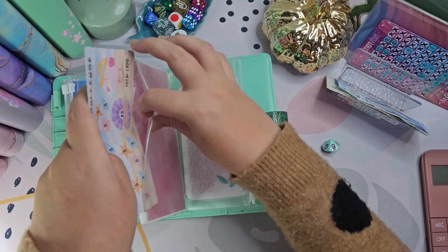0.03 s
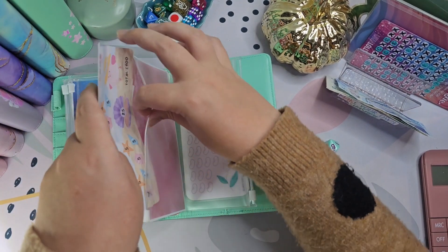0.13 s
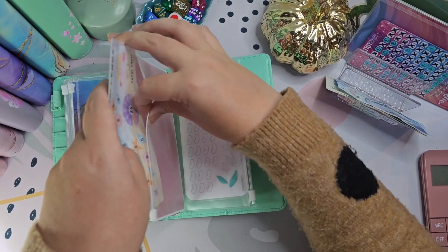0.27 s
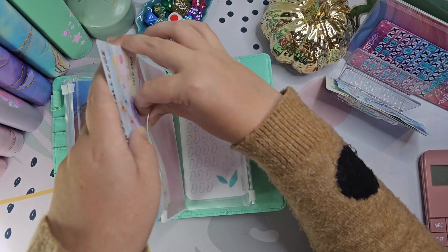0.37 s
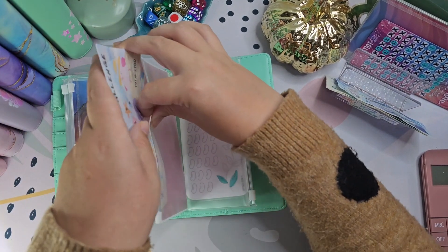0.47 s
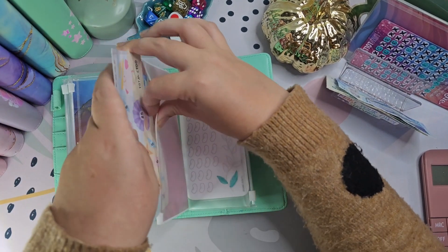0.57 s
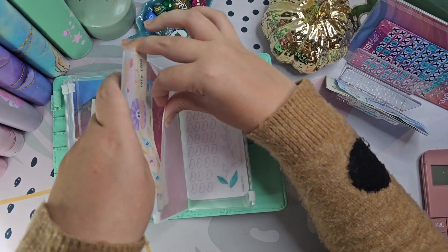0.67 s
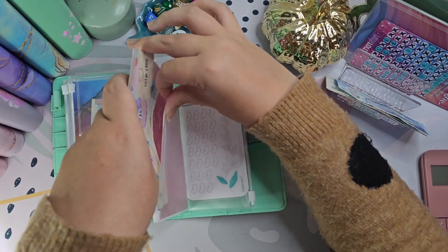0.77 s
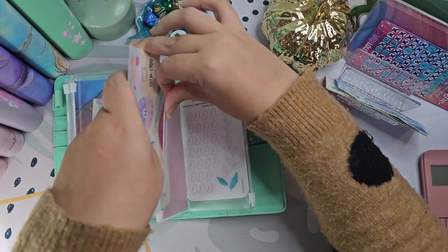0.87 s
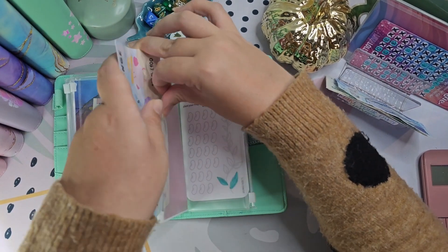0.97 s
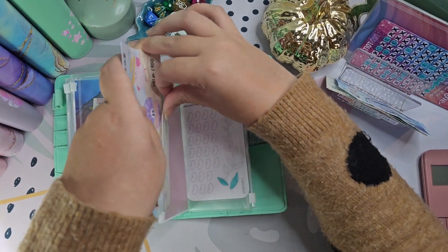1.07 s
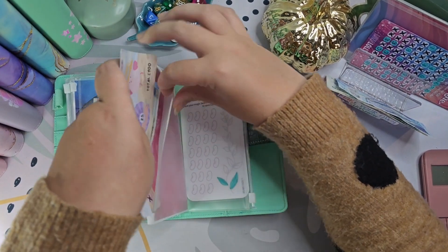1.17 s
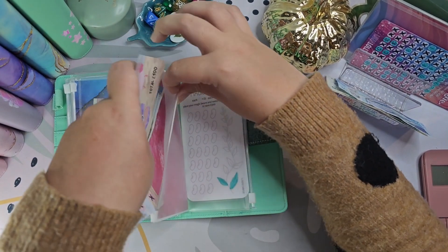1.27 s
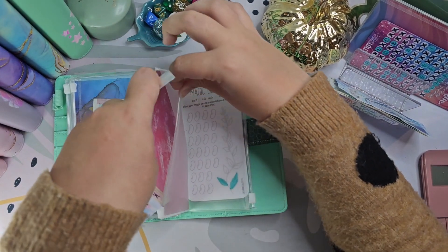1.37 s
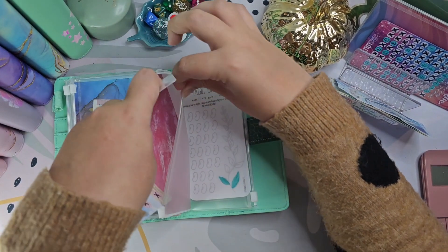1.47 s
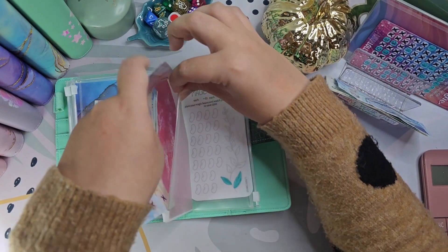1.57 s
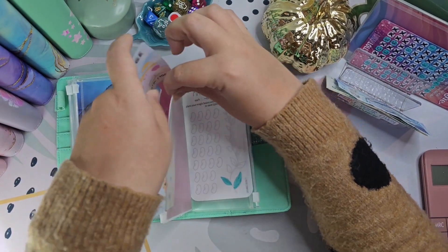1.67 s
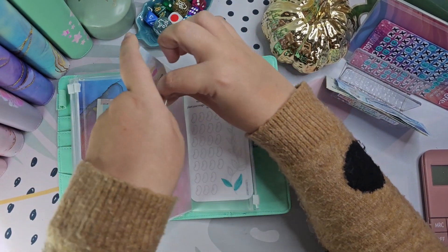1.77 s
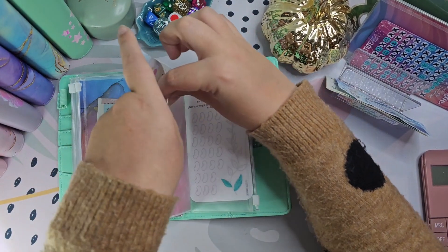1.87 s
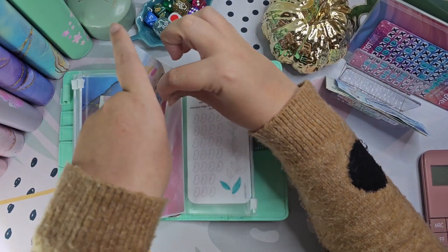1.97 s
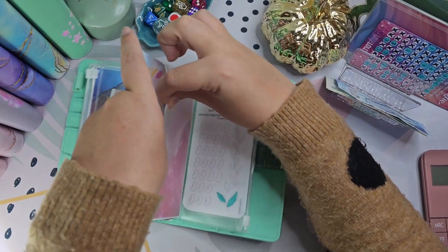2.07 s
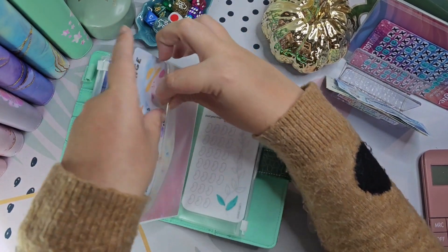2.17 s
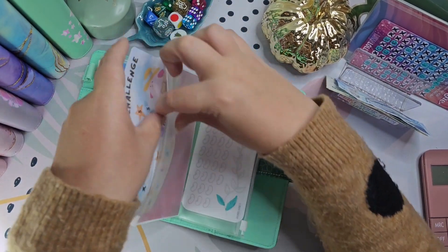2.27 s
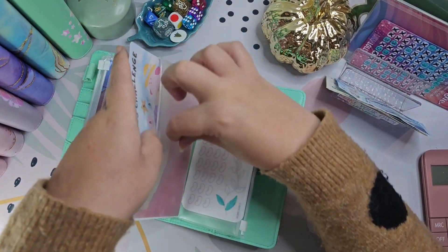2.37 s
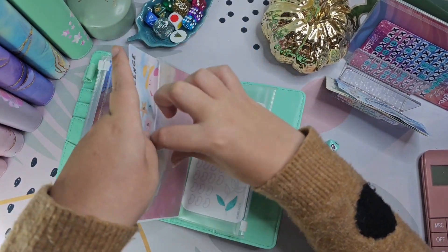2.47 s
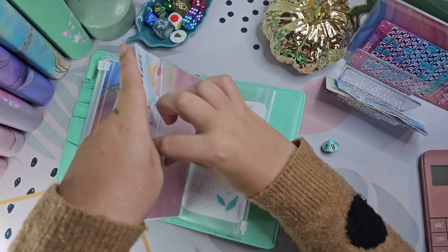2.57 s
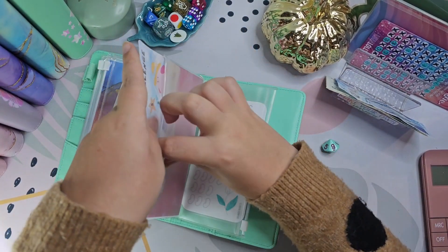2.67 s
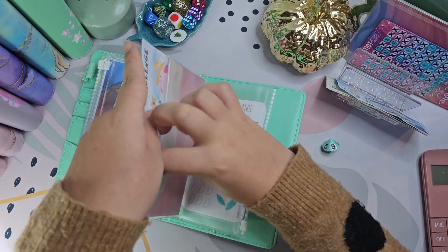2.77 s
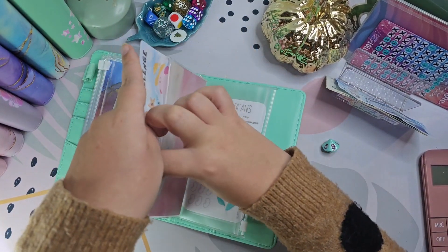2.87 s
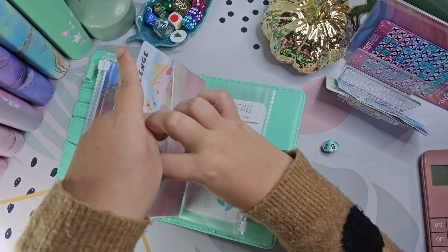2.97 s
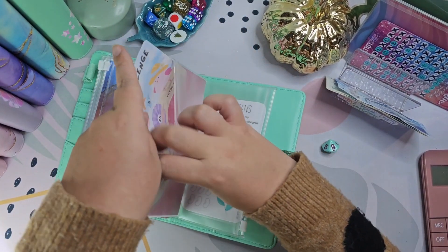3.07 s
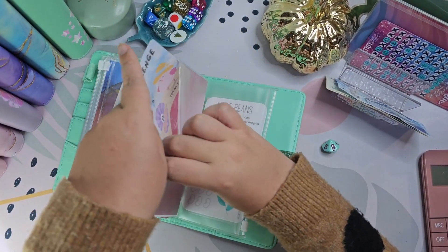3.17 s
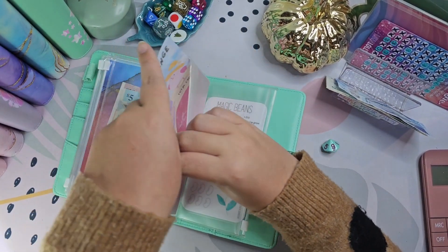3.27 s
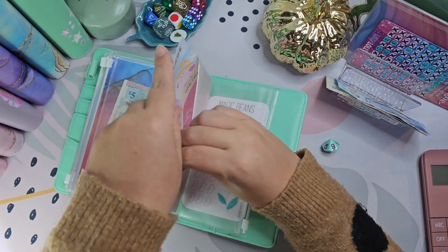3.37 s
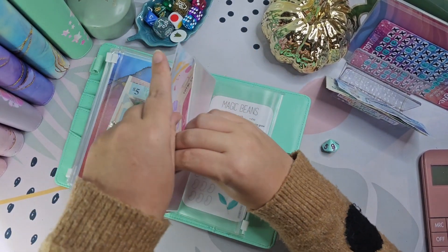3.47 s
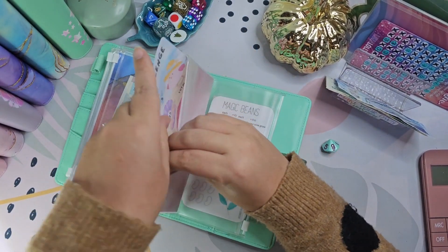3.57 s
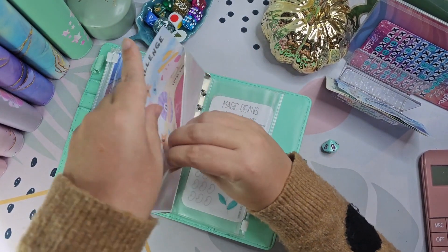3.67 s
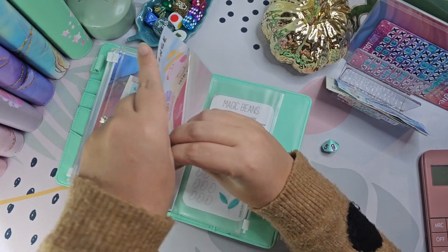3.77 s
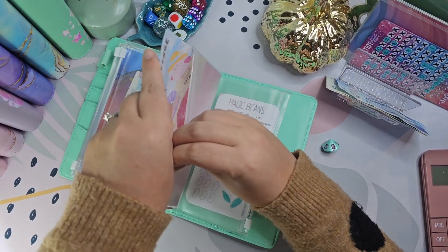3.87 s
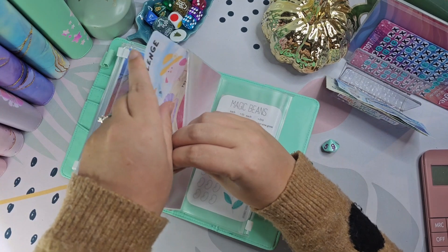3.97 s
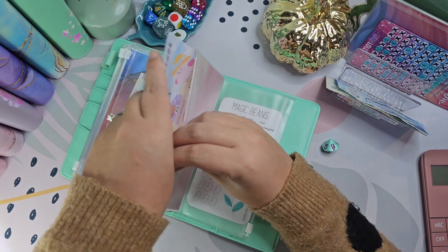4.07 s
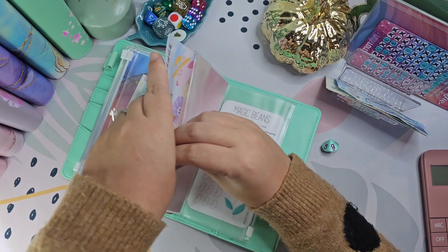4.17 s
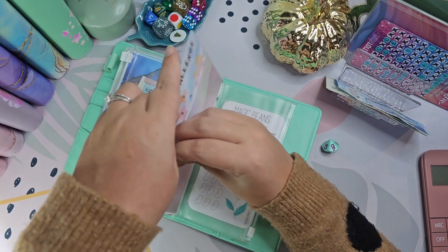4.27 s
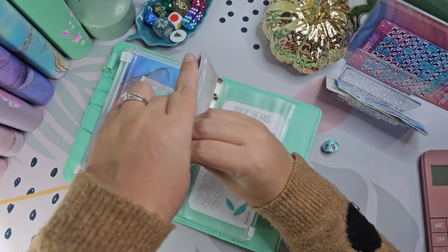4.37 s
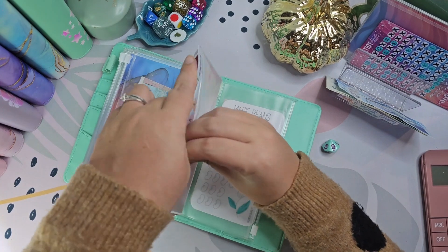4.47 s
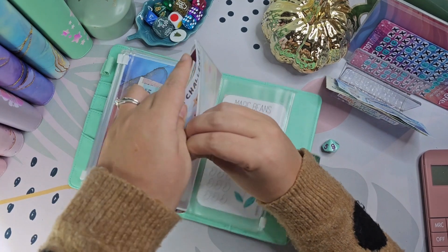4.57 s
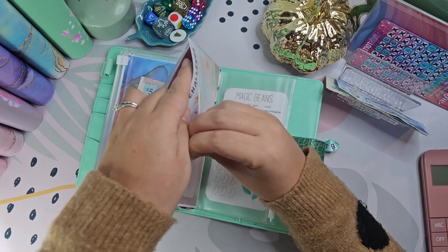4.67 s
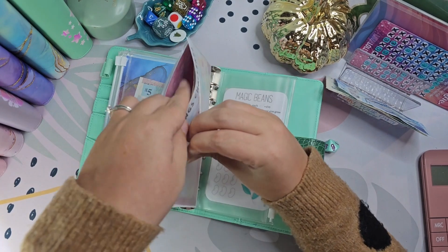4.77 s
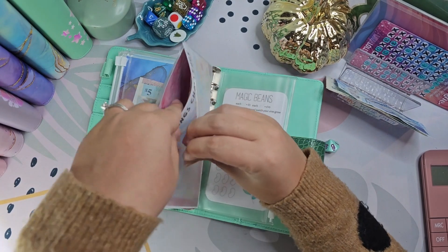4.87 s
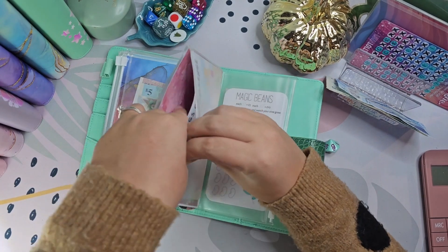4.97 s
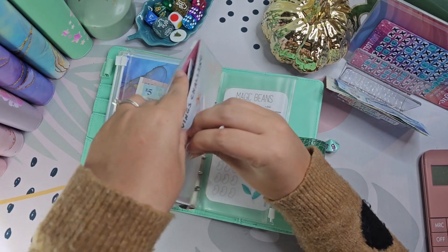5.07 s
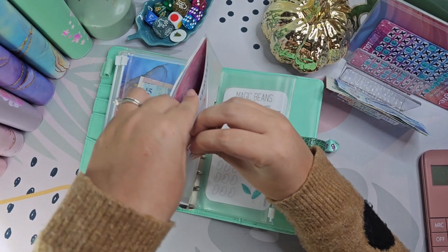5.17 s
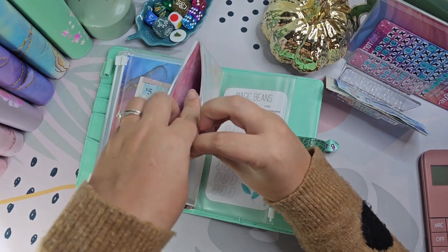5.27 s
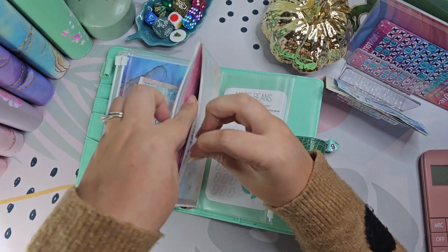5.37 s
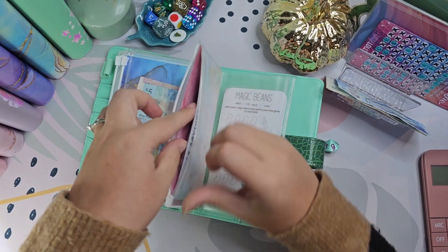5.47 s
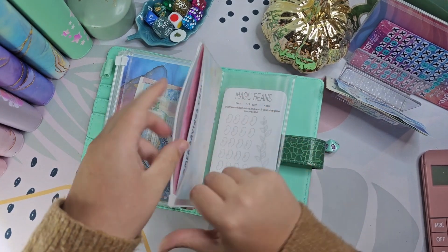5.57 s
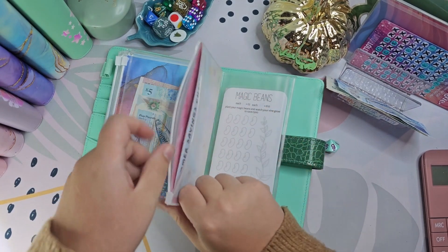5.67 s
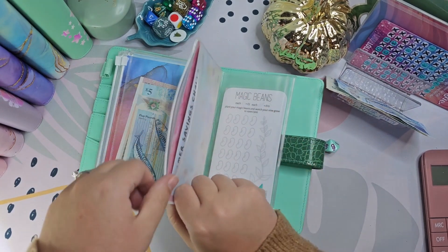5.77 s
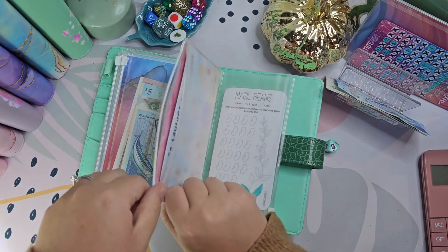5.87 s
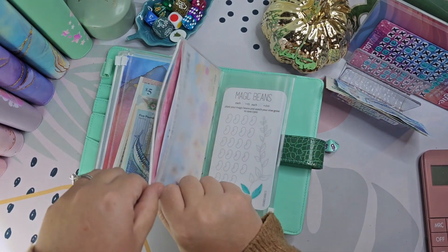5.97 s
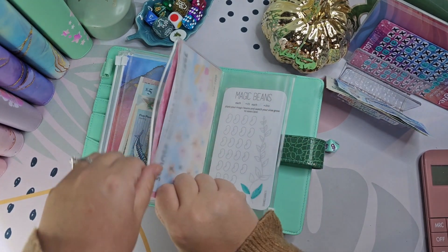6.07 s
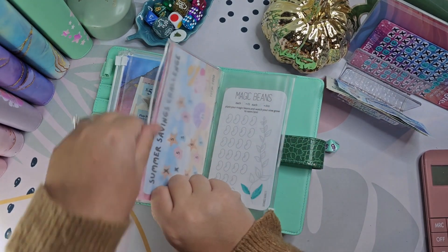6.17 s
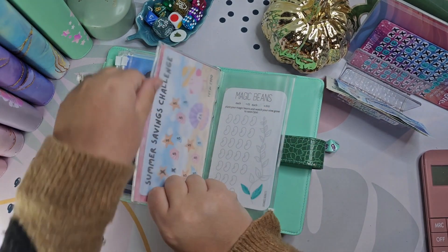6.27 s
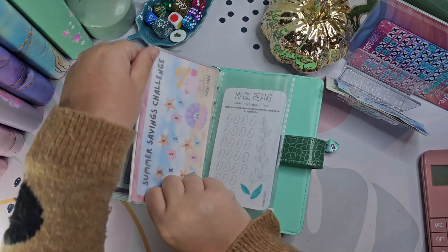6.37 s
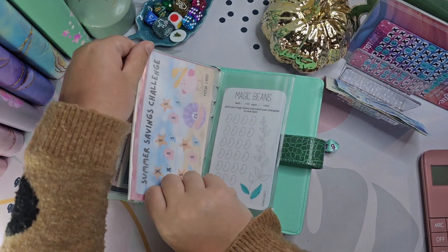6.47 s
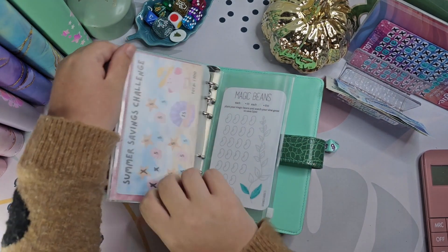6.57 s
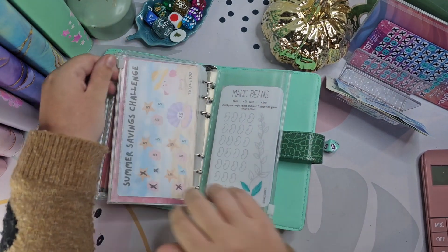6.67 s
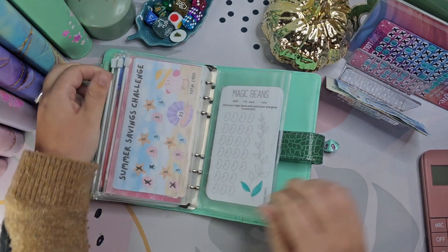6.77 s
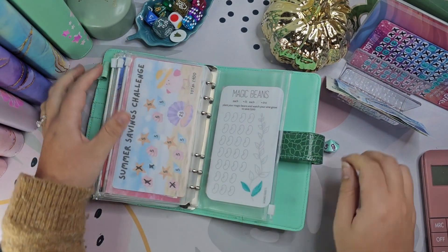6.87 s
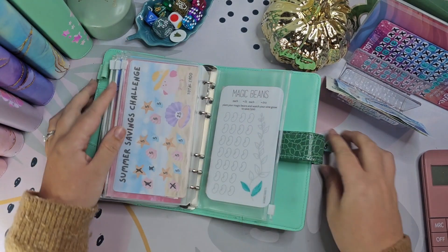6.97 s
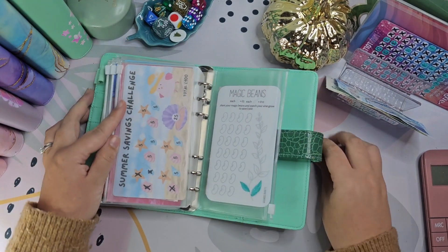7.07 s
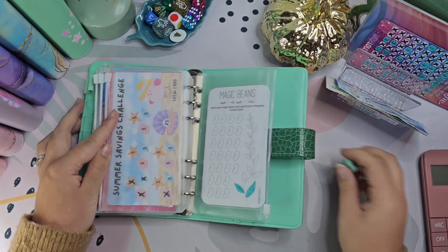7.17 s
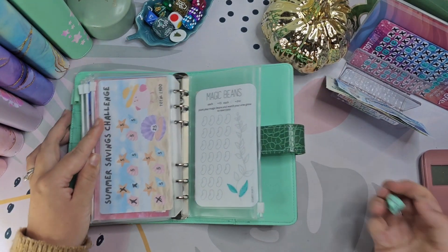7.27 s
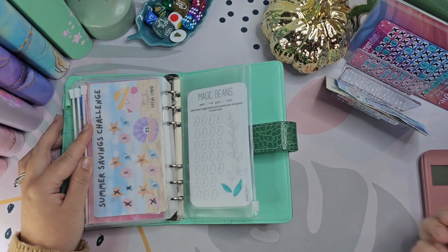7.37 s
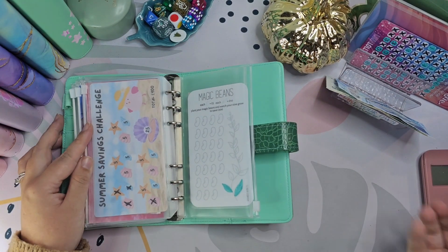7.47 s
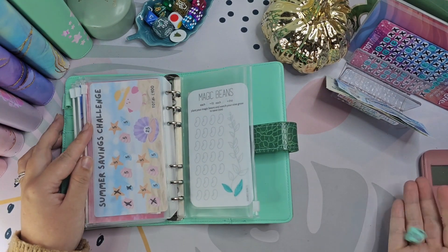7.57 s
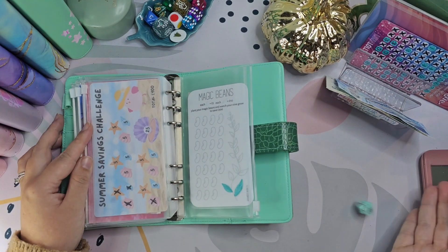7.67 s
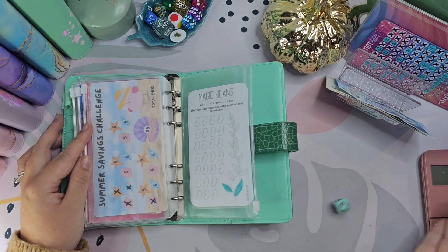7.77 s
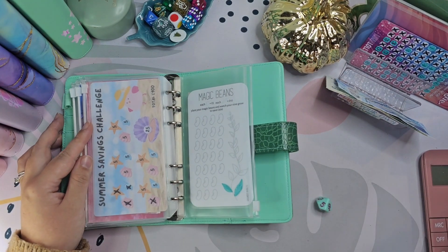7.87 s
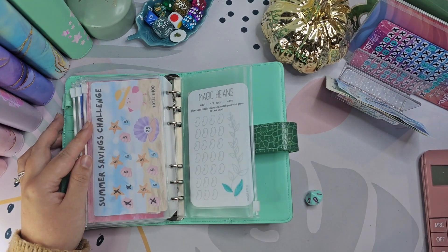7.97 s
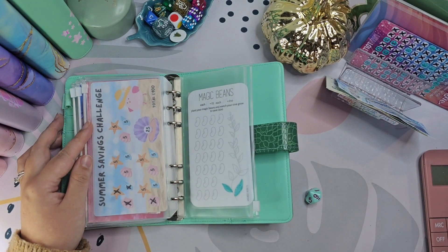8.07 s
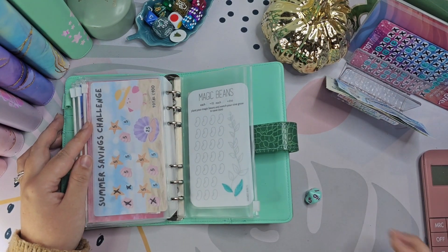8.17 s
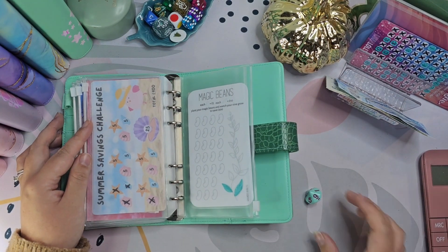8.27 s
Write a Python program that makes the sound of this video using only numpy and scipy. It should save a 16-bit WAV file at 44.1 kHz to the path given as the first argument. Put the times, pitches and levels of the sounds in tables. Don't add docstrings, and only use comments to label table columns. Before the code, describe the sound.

A small quiet room with faint low hush, heard close in stereo with little reverberation. From 0 to 0.6 s there is light film rustle and tiny ticks, then a sharp snap and soft drop at 0.6. Between 0.9 and 1.8 s, strokes of plastic bring knocks, a heavier low thud near 1.15, hollow rubs and a bright crackling swish at 1.75. Softer rustling follows, with snaps at 2.3 and a strong crisp pop at 2.7. After a short lull, 3.0 to 5.5 s is busiest: crinkles, pocket knocks, a hard cluster with a desk shove near 4.27, and a bright stroke at 4.93. Rustling thins until small crackles at 6.4-6.8. A smooth sleeve slide with light bumps runs 6.9-7.4, then near silence. At 7.7 a die strikes the desk loudest of all, bouncing at 7.8, 7.88, 7.93 and 8.0, then settling by 8.04 with a faint final brush.

```python
import sys
import numpy as np
from scipy import signal
from scipy.io import wavfile

SR = 44100
rng = np.random.default_rng(int(sys.argv[2]) if len(sys.argv) > 2 else 0)


def master_out(mix):
    frames = np.transpose(np.atleast_2d(mix))
    ceiling = np.clip(frames, -1, 1)
    pcm = np.round(ceiling * 32767).astype(np.int16)
    wavfile.write(sys.argv[1], SR, pcm)


def makeup_ratio(level_db):
    decades = np.asarray(level_db, float) / 20
    return 10 ** decades


N = 367088

# f/Hz, density/dB per Hz
HUSH_SPECTRUM = [(15, -29), (25, 0), (144, -3.5), (260, -2), (368, -21.5), (457, -6.5), (1050, -24),
                 (1410, -33), (2700, -30), (4620, -23.5), (9810, -48.5), (11500, -29), (15500, -47)]
HUSH_DB = -74
# f/Hz, likeness/0-1
PORT_LIKENESS = [(60, 0.85), (300, 0.69), (1000, 0.73), (3000, 0.37), (8000, 0.3), (15000, 0.27)]
# f/Hz, width/Hz, lift/dB
PORT_RESONANCES = [(11560, 1250, 8.5), (10330, 78, -9.5), (4520, 3900, 4.5)]
HANDS_LEAD_SAMPLES, DIE_LEAD_SAMPLES = 6, -4
BAND_EDGES_HZ = np.append(25 * 2 ** np.arange(0, 9.3, .4), 16200)
TOP_HZ = 16100
ROOM_T60_S, ROOM_DB, WALL_CUT_HZ = 0.11, -8.5, 7300
DESK_ECHO_S, DESK_ECHO_GAIN = 0.00213, 0.4

# f/Hz, density/dB per Hz
SHAKE_SPECTRUM = [(25, -25.5), (45, -16), (80, -9.5), (140, -5.5), (260, -4.5), (500, -46)]
# t/s, level/dB
SHOVES = [(0.25, -69), (0.52, -80), (0.64, -76), (1.03, -73), (1.17, -59), (1.38, -57), (1.68, -60),
          (2.11, -59), (2.32, -61.5), (3.28, -81), (3.9, -69), (4.29, -52.5), (4.941, -54), (6.41, -74.5),
          (6.82, -59.5), (6.991, -55.5), (8.1, -75)]
SHOVE_RISE_S, SHOVE_FALL_S, SHAKE_OVER_GRIP_DB = 0.077, 0.13, 3.5
# t/s, level/dB
JOLTS = [
    (1.161, -69),
    (4.27, -59),
    (4.97, -64),
    (6.99, -56),
    (7.71, -51),
    (7.94, -65),
]
STAND_HZ, STAND_T60_S = 44.7, 0.46
# t/s, level/dB, f/Hz
THUDS = [
    (0.621, -56, 77),
    (1.164, -47, 62.5),
    (1.655, -64, 80),
    (3.89, -62, 97),
    (4.33, -67, 110),
    (4.93, -65, 85),
    (6.40, -67, 71),
    (6.976, -63, 110),
    (7.099, -59, 182),
]
THUD_CYCLES = 5.0

# t/s, desk level/dB, tick over desk/dB
LANDINGS = [
    (7.6999, -23, -16.5),
    (7.8061, -31.5, -15),
    (7.8759, -41.5, -24),
    (7.8824, -39, -18),
    (7.931, -37, -24.5),
    (7.9951, -45.5, -35),
    (8.023, -62, -30),
    (8.037, -68, -25.5),
]
# f/Hz, level/dB, t60/s
DESK_MODES = [(119, -5, 0.065), (211.7, -4.5, 0.15), (269, 5, 0.035), (301.4, 9.5, 0.042), (461, 1.5, 0.06),
              (524, -16, 0.034), (597, -6, 0.072), (714, -5, 0.04), (960, -4, 0.032), (1240, -27, 0.02)]
# f/Hz, level/dB, t60/s
DIE_MODES = [(2730, 7, 0.0025), (3600, -1, 0.0017), (4600, 7, 0.002), (5600, -7.5, 0.0022),
             (7400, -22, .002), (11500, -8, .003)]

# t/s, length/s, level/dB, pipe f/Hz
MOUTH_RUBS = [(0.453, 0.022, -65, 3500), (0.938, 0.027, -55.5, 850), (1.504, 0.047, -51, 980),
              (1.555, 0.039, -49.5, 916), (1.707, 0.051, -55.5, 960), (1.738, 0.031, -61, 4600),
              (3.874, 0.017, -44, 1640), (4.188, 0.028, -51, 1860), (5.107, 0.044, -54, 2320),
              (5.254, 0.043, -60.5, 1050), (5.322, 0.015, -52, 1940), (5.397, 0.073, -62, 322),
              (5.458, 0.11, -61, 454), (2.108, 0.055, -59, 576), (4.274, 0.011, -42.5, 905),
              (5.461, 0.018, -51, 1830), (5.54, 0.023, -55, 2120), (6.589, 0.021, -52, 1840),
              (7.936, 0.03, -68.5, 11500)]
# t/s, crack peak/dB, tick over crack/dB, thump over crack/dB, thump f/Hz
KNOCKS = [(0.3326, -50.5, -5, 3.5, 870), (0.5119, -54, -7, 18.5, 316), (0.6137, -29.5, -47, -6, 268),
          (1.0191, -43.5, -3, -1.5, 278), (1.1192, -42, -15, 9.5, 890), (1.1412, -44.5, -11, 2, 512),
          (1.1564, -34, -21, -9, 209), (1.3778, -28, -26, 9.5, 820), (1.4027, -48.5, 10, -9, 834),
          (2.106, -48, -12, 7, 306), (2.3011, -33, -14, -18, 274), (2.4335, -45, 1.5, 0, 435),
          (2.582, -37, -2, -5, 694), (2.6935, -30, -3.5, 8, 498), (3.263, -34, -6, -8, 265),
          (3.313, -46, -12, -0.5, 494), (3.5809, -38, -19, -4.5, 620), (3.7939, -37.5, -16, 3.5, 497),
          (4.2648, -31.5, -9, 1, 477), (4.2669, -29.5, -7, -6, 263), (4.6538, -44.5, -5, -6, 870),
          (5.0586, -38, -4, -10.5, 880), (6.7982, -52.5, -6, 9, 260), (6.9751, -57, -8, 16, 276)]
# t/s, crack peak/dB, tick over crack/dB, thump over crack/dB
CREASES = [(0.0547, -48, -18, -14), (0.18, -58, -19, 1), (0.448, -47, -3, -27), (0.7223, -57, 10.5, -28),
           (1.084, -47, -8, -16), (1.341, -33.5, -2, -35), (1.6585, -43, -5, -28), (1.7399, -46.5, 26, -39),
           (3.0138, -48.5, 8, -9), (3.0597, -50, -18, -0.5), (3.1044, -41, -15, -5), (3.4514, -32, -9, -45),
           (3.7475, -41, -23, -9), (3.867, -33.5, -17, -34), (4.033, -62.5, 14, -26),
           (4.206, -35, -14, -13), (4.389, -32.5, -15, -10.5), (4.579, -39.5, -10, -36),
           (4.925, -36.5, -21, -4.5), (4.9726, -31, -31, -40), (5.1182, -44.5, 0, -41),
           (5.2134, -39.5, -9, -18), (5.2574, -41, 0, -37), (5.453, -42, -22, -23), (5.682, -55, -10, -7),
           (6.403, -51, 5, -24), (6.528, -52, -16, -32), (6.577, -39, -2.5, -17), (6.74, -47, 9, -33),
           (6.9333, -45, 6, -24)]
# t/s, crack peak/dB
EDGE_TICKS = [(0.907, -50), (2.908, -61), (3.547, -50), (4.11, -56), (4.7378, -47), (4.82, -61),
              (4.834, -49), (4.99, -52), (5.05, -50), (5.465, -51), (3.6, -58), (3.64, -61), (1.554, -58),
              (0.46, -53), (5.096, -44.5), (6.011, -60), (6.114, -52), (6.7202, -52), (6.774, -45.5),
              (6.844, -55), (7.39, -62)]
EDGE_TICK_BRIGHT_DB, EDGE_TICK_THUMP_DB = -1.5, -22
POCKET_HZ, CENTRE_HZ, LEFT_DB_PER_OCTAVE = 470, 560, 3.5
# t/s, peak/dB, f/Hz
CRINKLES = [(0.1808, -45, 1390), (0.2009, -45.5, 1400), (0.2293, -63, 2760), (0.2542, -51, 3470),
            (0.6162, -28, 1450), (0.876, -47, 1770), (0.8866, -41, 3520), (1.092, -45, 1730),
            (1.1203, -36, 2100), (1.3426, -43, 4230), (1.3683, -39, 5340), (1.3795, -45, 4660),
            (1.4797, -61, 2950), (1.4992, -39, 1210), (1.5418, -51, 1660), (1.732, -32, 4330),
            (1.743, -32, 4610), (1.7507, -33, 4570), (2.2791, -62, 4220), (2.2998, -47, 3060),
            (2.435, -36, 3230), (2.5833, -37, 4440), (2.6953, -22, 3840), (3.1066, -42, 4380),
            (3.2644, -33, 3230), (3.4532, -26, 3000), (3.5807, -44, 3270), (3.7223, -55, 1940),
            (3.795, -41, 3470), (3.871, -34.5, 1290), (3.9309, -46, 3080), (4.0253, -53, 3080),
            (4.0571, -50, 3080), (4.0825, -55, 5300), (4.1417, -57, 2890), (4.172, -39, 4370),
            (4.2106, -33, 2780), (4.2537, -43, 4390), (4.2681, -25, 1980), (4.3893, -56, 4050),
            (4.5789, -34, 3730), (4.654, -47, 2020), (4.8666, -56, 3730), (4.9275, -41, 2930),
            (4.9741, -39, 5870), (5.039, -40.5, 2280), (5.1202, -40, 3150), (5.452, -38.5, 2350),
            (5.5281, -49, 2130), (6.527, -47, 1770), (6.5797, -45, 3730), (6.5888, -33, 1870),
            (6.5952, -40, 1840), (6.6105, -43, 4820), (6.7198, -43, 3980), (6.742, -40.5, 7500),
            (6.748, -43, 4590), (6.772, -35.5, 4760),
            (0.723, -45, 4900), (1.021, -42, 4800), (1.4025, -39, 7040), (2.0923, -41.5, 950),
          (3.314, -48, 2700), (4.2685, -29.5, 1020), (4.389, -37, 2700), (5.2148, -48, 1500),
          (5.258, -57, 1050), (6.535, -47, 1700), (2.697, -32, 1900), (1.3795, -35, 1800),
          (1.3795, -39, 2750), (0.617, -37, 2650), (0.617, -36, 3500), (0.24, -55, 410), (0.34, -54, 210),
          (2.8, -40, 1950), (2.811, -58, 550), (1.121, -36, 520), (1.124, -41, 300), (4.3895, -38, 1500),
          (4.3895, -41, 3200), (4.58, -47, 1010), (4.93, -42.5, 360), (4.975, -42, 1500), (4.268, -35, 400),
          (3.88, -37, 1160), (1.5, -43, 2050), (4.7, -47, 1530), (1.385, -39, 270), (2.699, -33, 446),
          (0.29, -56, 3600), (0.47, -52, 1250), (3.21, -55, 2000), (3.415, -52, 1750), (3.61, -48, 1270),
          (3.63, -50, 3900), (3.92, -59, 1000), (3.96, -49, 1700), (4.11, -53, 7500), (4.83, -49, 7300),
          (4.58, -44, 3000), (5.67, -58, 3200), (6.015, -57, 1900)]
CRINKLE_CYCLES, CRINKLE_S, CRINKLE_EDGE_GAIN, CRINKLE_DB = 16, 0.0004, 0.45, -1.5

# f/Hz, density/dB per Hz
FILM_SPECTRUM = [(180, -19.5), (300, -24), (440, -13.5), (737, -16.5), (842, -14), (1230, -19.5),
                 (1840, -6.5), (2610, -11.5), (4520, -6.5), (6620, -13.5), (7950, -8.5), (11700, -20),
                 (16000, -12.5)]
# t/s, pressure as rustle/dB, speed as brightness/dB
GRIP = [(0.0, -82, -2), (0.16, -82, -7), (0.25, -71.5, -1), (0.55, -71, 0.5), (0.8, -73, -5),
        (1.05, -82.5, -13), (1.3, -74.5, -5), (1.62, -74, -13), (2.5, -78, -5), (2.92, -84, -6.5),
        (3.04, -74, -7), (3.55, -73, -5.5), (4.05, -73, -4), (4.32, -76, 1.5), (5.52, -71, -2),
        (5.74, -78, -9.5), (6.4, -81.5, -6), (8.25, -89, -11)]
# peak t/s, rise/s, fall/s, rustle/dB, brightness/dB
STROKES = [(0.06, 0.28, 0.077, -75.5, -8), (0.452, 0.023, 0.12, -60.5, -11.5),
           (0.94, 0.11, 0.13, -63.5, 1.5), (1.09, 0.03, 0.086, -70.5, -0.5),
           (1.159, 0.077, 0.021, -57, -12.5), (1.38, 0.065, 0.079, -63, 2), (1.501, 0.041, 0.13, -65, 1),
           (1.556, 0.034, 0.089, -61, -0.5), (1.748, 0.059, 0.062, -48.5, 6),
           (2.215, 0.18, 0.04, -63.5, 2.5), (3.639, 0.16, 0.061, -60, -2), (3.75, 0.029, 0.12, -60.5, -3.5),
           (3.878, 0.11, 0.16, -61, -2.5), (4.183, 0.11, 0.11, -56, -3.5), (4.5, 0.29, 0.18, -64, 0.5),
           (4.935, 0.076, 0.046, -52, 4), (5.06, 0.14, 0.13, -64.5, -2), (5.321, 0.42, 0.072, -65, 1),
           (6.14, 0.072, 0.22, -75, 8.5), (6.587, 0.095, 0.1, -64.5, 3), (6.762, 0.078, 0.14, -69.5, 7),
           (7.53, 0.073, 0.13, -89.5, 13), (8.32, 0.066, .1, -77, 5.5)]
# peak t/s, half length/s, rustle/dB, brightness/dB
BRUSHES = [(0.237, 0.042, -76, 0), (0.4, 0.099, -82, 12), (2.056, 0.44, -69.5, 0.5),
           (2.329, 0.13, -67, 0.5), (3.406, 0.14, -66.5, 1.5), (4.327, 0.11, -65, -1.5),
           (4.741, 0.1, -66.5, -0.5), (5.167, 0.066, -80, 18), (5.544, 0.074, -61.5, -2),
           (5.652, 0.083, -82, 12.5), (6.254, 0.23, -75, 3.5), (5.776, 0.057, -84, 8),
           (4.618, 0.18, -67.5, 1.5), (6.832, 0.017, -72.5, 13.5), (6.92, 0.13, -64.5, -3.5)]
STROKE_SWELL_DB = 24
FLUTTER_DB, FLUTTER_DB_PER_BRIGHT_DB, GRIP_FLUTTER_DB = -4.5, -0.6, -1.5
GLIDE_START_S, GLIDE_FASTEST_S, GLIDE_END_S, GLIDE_EDGE_S = 6.86, 7.175, 7.42, 0.088
GLIDE_DB, GLIDE_BRIGHT_DB, GLIDE_FLUTTER_DB, GLIDE_ARCH_DB_PER_S2 = -67.5, 5, -1.5, 111
PUFF_HISS_DB, PUFF_CRINKLE_DB, PUFF_FLUTTER_DB = -26.5, -25.5, -22.5
PUFF_RISE_S, PUFF_FALL_S = 0.0088, 0.047
CRACKLES_PER_S, CRACKLE_DB, CRACKLE_CYCLES = 220, -7, 45
# f/Hz, width/Hz, lift/dB
HOLLOW_MODES = [(456, 70, 11), (870, 100, 4), (1450, 160, 10.5), (1880, 66, 9), (3390, 180, 4.5),
                (4480, 120, 6.5)]
# t/s, share/0-1.5
OPENING = [(0.0, .5), (0.2, 1), (0.9, 1.1), (1.2, 0.38), (2.6, 0.43), (2.85, 1.14), (3.6, 1.16), (3.9, 0.7),
           (5.3, 0.55), (5.6, 0.84), (6.1, 0.8), (6.3, 0.12), (8.3, 0.13)]


def rms_one(x):
    return x / np.sqrt(np.mean(x ** 2) + 1e-20)


def peak_one(x):
    return x / np.abs(x).max()


def in_time(table):
    s, *columns = np.transpose(table)
    return [np.interp(np.arange(N) / SR, s, c) for c in columns]


def at_hz(points, hz):
    point_hz, value = np.transpose(points)
    return np.interp(np.log(hz), np.log(point_hz), value)


def band(x, low_hz, high_hz):
    return signal.sosfilt(signal.butter(2, [low_hz, high_hz], "band", fs=SR, output="sos"), x)


def drift(rate_hz):
    r = np.exp(-80 * np.pi * rate_hz / SR)
    slow = signal.lfilter([1], [1, -2 * r, r * r], rng.standard_normal(N // 40 + 2002))[2000:]
    return np.interp(np.arange(N) / 40, np.arange(len(slow)), rms_one(slow))


def ring(clicks, hz, t60_s):
    r, w = makeup_ratio(-60 / (t60_s * SR)), 2 * np.pi * hz / SR
    return signal.lfilter([0, np.sin(w)], [1, -2 * r * np.cos(w), r * r], clicks + 1e-18)


def ports(pair, lead_samples):
    return np.array([np.roll(pair[0], -lead_samples // 2), np.roll(pair[1], lead_samples // 2)])


def coloured(source, spectrum, low_hz, high_hz, patchy_db, likeness_scale):
    out = 0
    for k, (low, high) in enumerate(zip(BAND_EDGES_HZ, BAND_EDGES_HZ[1:])):
        hz = np.sqrt(low * high)
        if low_hz <= hz < high_hz:
            mid, side = band(source[k % 2], low, high)
            alike = np.clip(likeness_scale * at_hz(PORT_LIKENESS, hz), 0, 1)
            gain = makeup_ratio(at_hz(spectrum, hz) + patchy_db * drift(16.5))
            out = out + gain * (np.sqrt(1 + alike) * mid + np.sqrt(1 - alike) * side * [[1], [-1]])
    return rms_one(out)


def swells(peak_s, rise_s, fall_s, *levels_db):
    t = np.arange(0, N + 64, 64) / SR - np.reshape(peak_s, (-1, 1))
    away = np.where(t < 0, -t / np.reshape(rise_s, (-1, 1)), t / np.reshape(fall_s, (-1, 1)))
    power = makeup_ratio(-2 * STROKE_SWELL_DB * np.minimum(away, 9))
    gains = [np.sqrt(makeup_ratio(2 * db) @ power) for db in levels_db]
    return [np.interp(np.arange(N) / 64, np.arange(t.shape[1]), g) for g in gains]


def hush():
    white = rng.standard_normal((2, 2, N))
    return makeup_ratio(HUSH_DB) * coloured(white, HUSH_SPECTRUM, 25, 17000, patchy_db=0.2, likeness_scale=0.96)


def room(x):
    out, dull = np.zeros((2, N)), np.exp(-2 * np.pi * WALL_CUT_HZ / SR)
    lags = (rng.uniform(0.008, 0.022, 8) * SR).astype(int)
    for k, lag in enumerate(lags):
        loop, gain, state = x.copy(), makeup_ratio(-60 * lag / SR / ROOM_T60_S), [0.]
        for i in range(lag, N, lag):
            back, state = signal.lfilter([gain * (1 - dull)], [1, -dull], loop[i - lag:i], zi=state)
            loop[i:i + lag] += back[:N - i]
        out[k % 2] += (loop - x) * (-1) ** (k // 2)
    return out


def desk_echo(x):
    lag = round(DESK_ECHO_S * SR)
    return x + DESK_ECHO_GAIN * np.roll(x, lag, axis=1) + DESK_ECHO_GAIN ** 2 * np.roll(x, 2 * lag, axis=1)


def desk_shake():
    s, db = np.transpose(SHOVES)
    grip = makeup_ratio(in_time(GRIP)[0] + SHAKE_OVER_GRIP_DB)
    shoves = swells(s, SHOVE_RISE_S, SHOVE_FALL_S, db)[0]
    white = rng.standard_normal((2, 2, N))
    rumble = coloured(white, SHAKE_SPECTRUM, 25, 300, patchy_db=7.0, likeness_scale=1.0)
    return np.hypot(grip, shoves) * rumble


def stand_sway():
    clicks = np.zeros(N)
    for s, db in JOLTS:
        clicks[round(s * SR)] = makeup_ratio(db + 3.5)
    return band(ring(clicks, STAND_HZ, STAND_T60_S), 30, 65)


def thuds(size=8192):
    out, click = np.zeros(N), 1.0 * (np.arange(size) == 0)
    for s, db, hz in THUDS:
        at, t60_s = round(s * SR), THUD_CYCLES / hz
        push = ring(ring(click, hz, t60_s), hz, t60_s)
        out[at:at + size] += makeup_ratio(db) * peak_one(push)
    return out


def desk_bend(grain, chance_db, contact_hz, t):
    desk = 3.8 * band(grain * np.exp(-t / 0.0091), 350, 1120)
    for k, (hz, level_db, t60_s) in enumerate(DESK_MODES):
        arrival = int(.012 / np.sqrt(hz) * SR)
        blow = makeup_ratio(level_db + chance_db[k]) * (np.arange(len(t)) == arrival)
        desk += ring(blow, hz * (1 + 0.016 * chance_db[k - 1]), 1.46 * t60_s) * (-1) ** (k // 2)
    return peak_one(signal.sosfilt(signal.butter(6, contact_hz, fs=SR, output="sos"), desk))


def die_tick(grit, contact_hz, t):
    rattle = 3.6 * (t == 0) + grit * (np.exp(-t / 0.0016) + 0.094 * np.exp(-t / 0.0069))
    modes = sum(makeup_ratio(level_db) * ring(rattle, hz, t60_s) for hz, level_db, t60_s in DIE_MODES)
    tick = peak_one(modes) + 1.9 * band(rattle, 2200, 4650)
    return peak_one(band(tick, 1650, np.clip(6.8 * contact_hz, 6500, 11000)))


def die(size=6144):
    out, t = np.zeros(N + size), np.arange(size) / SR
    luck_db = rng.normal(0, 1.5, (len(LANDINGS), len(DESK_MODES)))
    noise = rng.standard_normal((len(LANDINGS), 2, size))
    for (s, db, tick_db), chance_db, (grain, grit) in zip(LANDINGS, luck_db, noise):
        contact_hz = np.clip(1300 * makeup_ratio(1.1 * (db - LANDINGS[0][1])), 650, 2000)
        desk = desk_bend(grain, chance_db, contact_hz, t)
        tick = die_tick(grit, contact_hz, t)
        at = round(s * SR)
        out[at:at + size] += makeup_ratio(db + 7.0) * (desk + makeup_ratio(tick_db) * tick)
    return out[:N]


def pocket_mouth(size=4096):
    out = np.zeros(N + size)
    grains = .5 + rng.exponential(1, (len(MOUTH_RUBS), size // 32)).repeat(32, axis=1)
    grit = rng.standard_normal((len(MOUTH_RUBS), size)) * grains
    for (s, length_s, db, hz), n in zip(MOUTH_RUBS, grit):
        swell = np.exp(-((np.arange(size) - size / 2) / (SR * length_s / 2)) ** 2)
        pipe = 0
        for k in range(3):
            pipe = pipe + makeup_ratio(-7.0 * k) * (hz * k < 6000) * ring(n, min(hz * (k + 1), 15000), 16.0 / hz)
        at = round(s * SR) - size // 2
        out[at:at + size] += makeup_ratio(db) * swell * rms_one(pipe)
    return out[:N]


def crinkles(size=1024):
    out, rows = np.zeros((2, N + size)), CRINKLES
    noise = rng.standard_normal((len(rows), 3, size))
    bursts = (noise[:, :1] + 0.51 * noise[:, 1:]) * np.exp(-np.arange(size) / SR / CRINKLE_S)
    for (s, db, hz), burst, edge in zip(rows, bursts, band(bursts, 1500, 9000)):
        patch, at = ring(burst, hz, CRINKLE_CYCLES / hz), round(s * SR)
        edge_gain = CRINKLE_EDGE_GAIN * min(hz / 1500, 1) ** 2
        out[:, at:at + size] += makeup_ratio(db + CRINKLE_DB) * (peak_one(patch) + edge_gain * peak_one(edge))
    return out[:, :N]


def snap_rows():
    rows = KNOCKS + [(*row, POCKET_HZ) for row in CREASES]
    rows += [(*row, EDGE_TICK_BRIGHT_DB, EDGE_TICK_THUMP_DB, POCKET_HZ) for row in EDGE_TICKS]
    return [(*row, LEFT_DB_PER_OCTAVE * np.log2(row[-1] / CENTRE_HZ)) for row in rows]


def pocket_thump(hz, upper_chance, lower_chance, t):
    push = ring(1.0 * (t == 0), hz, 0.37 / hz)
    upper_hz, lower_hz = hz * (1.3 + 1.1 * upper_chance), hz * (0.6 + 0.65 * lower_chance)
    thump = ring(push, hz, 10.0 / hz)
    thump = thump + 0.13 * ring(push, upper_hz, 10.0 / hz)
    thump = thump - 2.13 * ring(push, lower_hz, 1.8 / hz)
    return band(thump, 0.34 * hz, 1.8 * hz)


def snaps(size=2048):
    out, t = np.zeros((2, N + size)), np.arange(size) / SR
    rows = snap_rows()
    noise, chance = rng.standard_normal((len(rows), 3, size)), rng.random((len(rows), 3))
    burst = noise[:, :1] * np.exp(-t / (0.00058 + 0.0037 * chance[:, :1, None]))
    scatter = 0.47 * noise[:, 1:] * np.exp(-t / 0.004)
    shaken = (1 - np.exp(-t / 0.00032)) * (burst + scatter)
    cracks = band(shaken, 700, 4500)
    ticks = band(shaken * np.exp(-t / 0.004), 5000, 16000)
    for (s, db, tick_db, thump_db, hz, pan_db), crack, tick, (_, upper, lower) in zip(rows, cracks, ticks, chance):
        thump = pocket_thump(hz, upper, lower, t)
        sound = makeup_ratio(-3.0) * peak_one(crack)
        sound = sound + makeup_ratio(np.minimum(tick_db, -15.5 - db)) * peak_one(tick)
        sound = sound + makeup_ratio(thump_db) * peak_one(thump)
        at = round(s * SR)
        out[:, at:at + size] += makeup_ratio(db) * sound * makeup_ratio(np.clip(pan_db, -6, 6) * np.array([[.5], [-.5]]))
    return out[:, :N]


def effort():
    t = np.arange(N) / SR
    grip_db, speed_db = in_time(GRIP)
    grip = makeup_ratio(grip_db + [speed_db, 0 * t, GRIP_FLUTTER_DB + FLUTTER_DB_PER_BRIGHT_DB * speed_db])

    edge = np.minimum(np.minimum(t - GLIDE_START_S, GLIDE_END_S - t) / GLIDE_EDGE_S - 1, 0)
    arch_db = GLIDE_DB - GLIDE_ARCH_DB_PER_S2 * (t - GLIDE_FASTEST_S) ** 2
    glide = makeup_ratio(arch_db + STROKE_SWELL_DB * np.maximum(edge, -9))
    sleeve = glide * makeup_ratio([[GLIDE_BRIGHT_DB], [0], [GLIDE_FLUTTER_DB]])

    brushes = [(s, half_s, half_s, *rest) for s, half_s, *rest in BRUSHES]
    s, rise_s, fall_s, db, bright_db = np.transpose(STROKES + brushes)
    flutter_db = db + FLUTTER_DB + FLUTTER_DB_PER_BRIGHT_DB * bright_db
    strokes = swells(s, rise_s, fall_s, db + bright_db, db, flutter_db)

    s, db = np.transpose(snap_rows())[:2]
    puffs = swells(s + 0.0012, PUFF_RISE_S, PUFF_FALL_S,
                   db + PUFF_HISS_DB, db + PUFF_CRINKLE_DB, db + PUFF_FLUTTER_DB)
    return np.sqrt(grip ** 2 + sleeve ** 2 + np.square(strokes) + np.square(puffs))


def slips(per_s, spread_db, clump_db, smooth):
    born = rng.random(N) < per_s * makeup_ratio(clump_db * drift(40.0)) / SR
    sizes = makeup_ratio(spread_db * np.minimum(rng.exponential(1, N), 5)) * born
    felt = rms_one(signal.lfilter([1], [1, -.9], sizes))
    return rng.standard_normal((2, 2, N)) * (smooth + felt)


def crackle(rustle_gain, count=9):
    born = rng.random(N) < CRACKLES_PER_S * makeup_ratio(4.0 * drift(8.0)) / SR
    sizes = makeup_ratio(5.5 * np.minimum(rng.exponential(1, N), 4)) * born
    dealt = rng.integers(0, count, N)
    rings = 0
    for k, hz in enumerate(np.geomspace(1050, 7500, count)):
        rings = rings + ring(sizes * (dealt == k), hz, CRACKLE_CYCLES / hz)
    return makeup_ratio(CRACKLE_DB) * rustle_gain * rms_one(rings) * makeup_ratio([[1.4], [-1.4]])


def hollow(x):
    out = 0
    for hz, width_hz, db in HOLLOW_MODES:
        out = out + (makeup_ratio(db) - 1) * signal.lfilter(*signal.iirpeak(hz, hz / width_hz, fs=SR), x)
    return out


def sliding():
    hiss_gain, crinkle_gain, flutter_gain = effort()
    t = np.arange(N) / SR
    film = np.where((t > GLIDE_START_S) & (t < GLIDE_END_S), .25, 1)
    rub = slips(per_s=2500, spread_db=3.6 * film, clump_db=2.5 * film, smooth=1.2)
    hiss = coloured(rub, FILM_SPECTRUM, 4000, 17000, patchy_db=2.4 * film, likeness_scale=0.25)
    crinkle = coloured(rub, FILM_SPECTRUM, 1400, 4000, patchy_db=2.1 * film, likeness_scale=0.22)
    flutter = coloured(rub, FILM_SPECTRUM, 250, 1400, patchy_db=1.8 * film, likeness_scale=1.0)
    rubbing = hiss_gain * makeup_ratio(3.5) * hiss + crinkle_gain * makeup_ratio(5.0) * crinkle + flutter_gain * makeup_ratio(5.5) * flutter
    held = np.clip(makeup_ratio(in_time(GRIP)[0]) / crinkle_gain, 0, 1) ** 1.8
    opening = np.clip(in_time(OPENING)[0], 0, 1.5)
    rubbing = (rubbing + held * opening * hollow(rubbing)) * makeup_ratio(-3.5 * held)
    return rubbing + crackle(crinkle_gain * makeup_ratio(5.5 - 5.6 * held) * film ** 2)


def scene():
    cracks, landings = snaps() + pocket_mouth(), die()
    hands = ports(sliding() + cracks, HANDS_LEAD_SAMPLES)
    sharp = ports(desk_echo(crinkles()), HANDS_LEAD_SAMPLES)
    thrown = ports(landings * makeup_ratio([[-.6], [.6]]), DIE_LEAD_SAMPLES)
    echoes = makeup_ratio(ROOM_DB) * room(cracks.mean(axis=0) + landings)
    return hush() + desk_shake() + stand_sway() + thuds() + echoes + thrown + sharp + hands


def roll_off(x):
    return signal.sosfilt(signal.butter(12, 16800, fs=SR, output="sos"), x)


def record(dry):
    for hz, width_hz, db in PORT_RESONANCES:
        b, a = signal.iirpeak(hz, hz / width_hz, fs=SR)
        dry = dry + (makeup_ratio(db) - 1) * signal.lfilter(b, a, dry)
    mix = dry + makeup_ratio(-84) * band(rng.standard_normal(dry.shape), 5000, 16000)
    mix = signal.sosfilt(signal.cheby2(10, 50, TOP_HZ + 700, fs=SR, output="sos"), mix)
    return roll_off(mix)


dry = scene()
out = record(dry)
master_out(out)
```